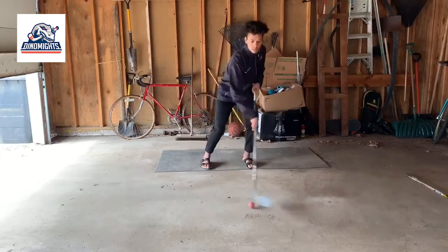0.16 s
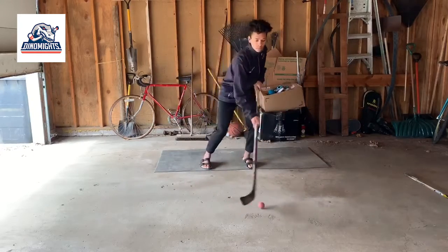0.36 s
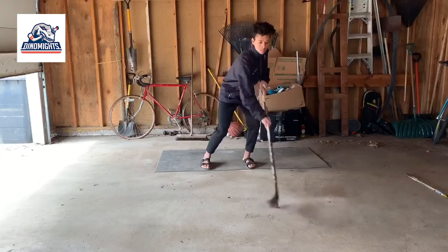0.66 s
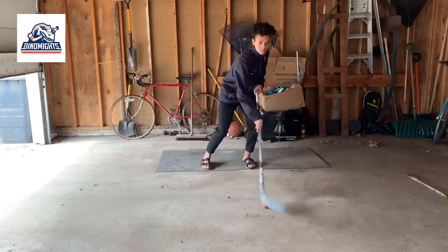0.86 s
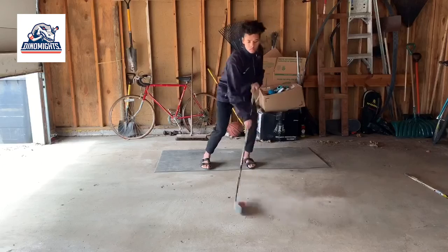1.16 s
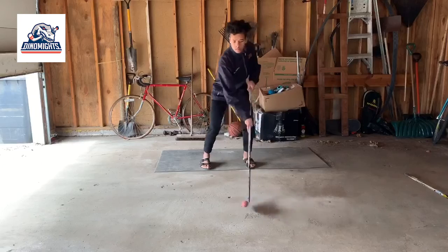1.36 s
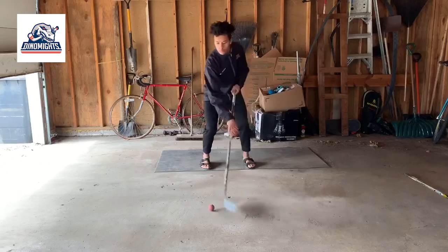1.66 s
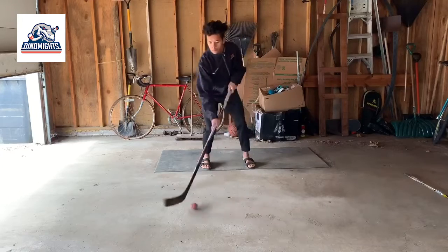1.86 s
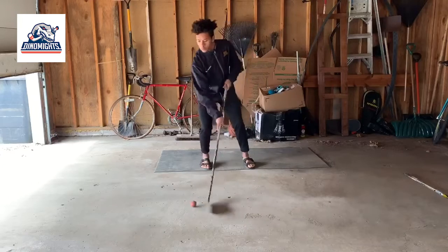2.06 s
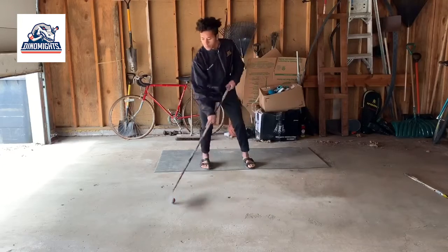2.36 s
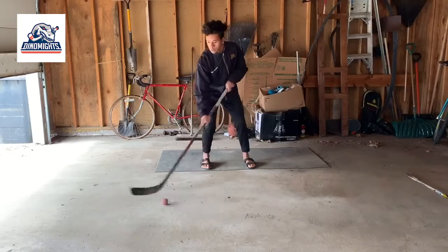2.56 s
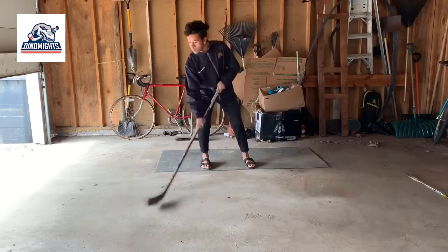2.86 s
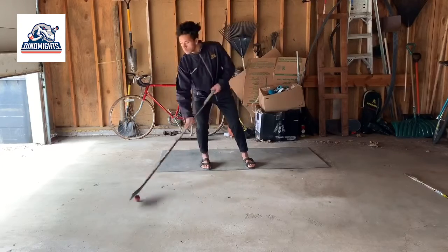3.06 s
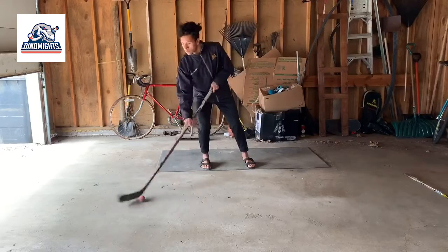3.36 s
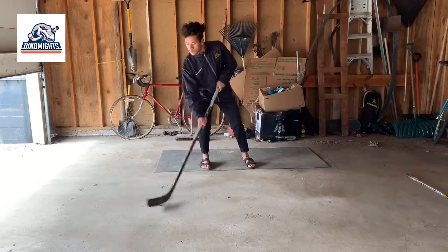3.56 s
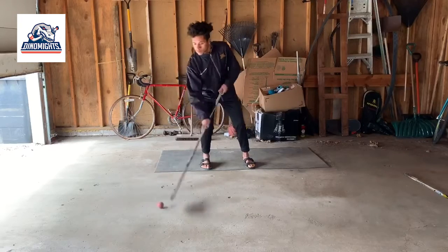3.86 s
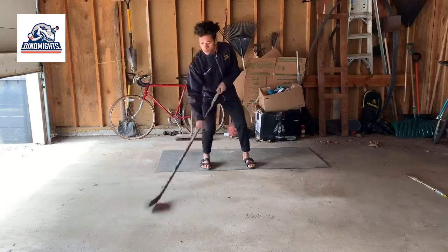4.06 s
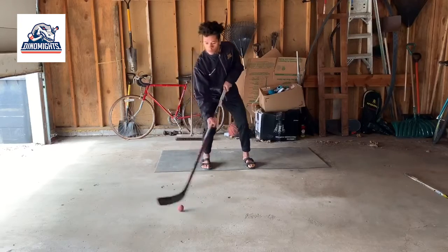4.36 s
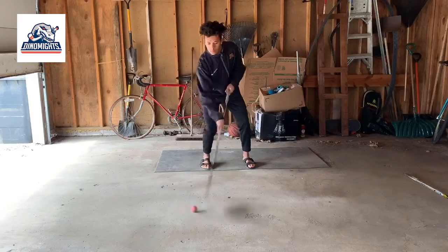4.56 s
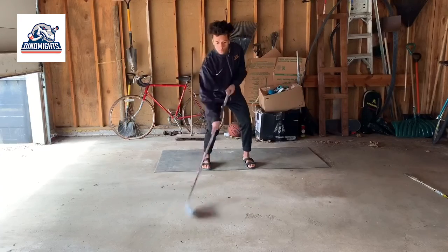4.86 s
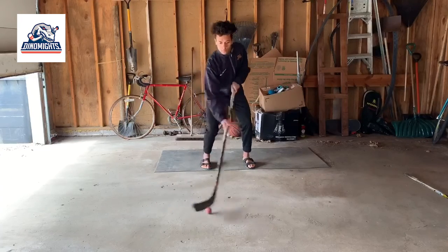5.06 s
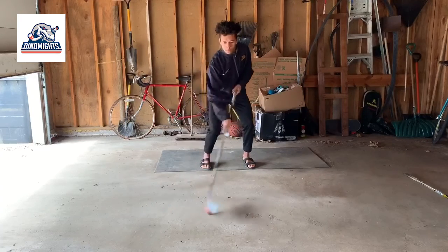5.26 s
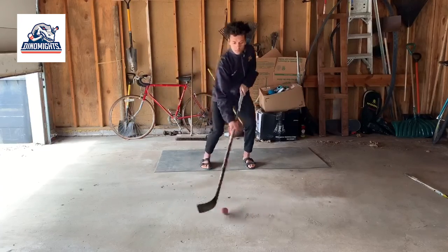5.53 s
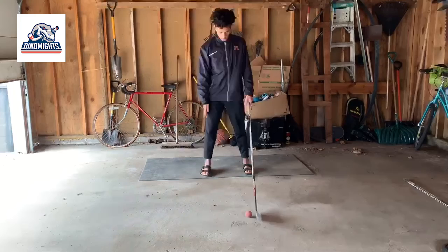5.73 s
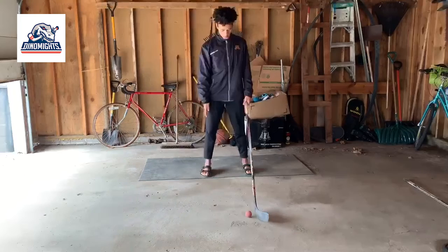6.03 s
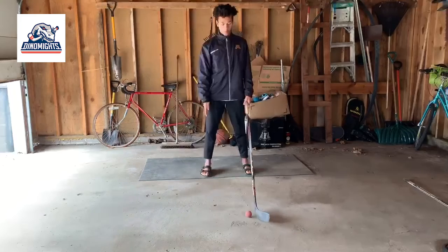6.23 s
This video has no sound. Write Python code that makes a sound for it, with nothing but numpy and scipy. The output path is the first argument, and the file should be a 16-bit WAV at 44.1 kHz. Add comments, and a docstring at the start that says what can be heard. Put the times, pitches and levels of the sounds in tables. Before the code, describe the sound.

Fast, steady clacks of a stick blade on concrete alternate with hollow ball taps in a reverberant garage, then sudden near quiet.

```python
"""A hockey stick sweeps a small hard ball from side to side on a concrete garage floor, near a microphone pair.
Each stroke is a sliding blade that slaps the concrete (struck modes plus noise) and taps the ball (knock and tick).
The bare garage answers with single echoes and a dense tail, over air hiss and distant traffic.
Near the end the play is cut off, and a quieter background follows, with a soft noise swish, a low hum
and one small knock."""
import sys
import numpy as np
from scipy import signal
from scipy.fft import rfft, irfft
from scipy.io import wavfile
from scipy.ndimage import uniform_filter1d, minimum_filter1d

SR = 44100
rng = np.random.default_rng(int(sys.argv[2]) if len(sys.argv) > 2 else 0)


def master_out(mix):
    """Clip the mix to full scale and print it as 16-bit PCM to the path in sys.argv[1]."""
    frames = np.transpose(np.atleast_2d(mix))
    ceiling = np.clip(frames, -1, 1)
    pcm = np.round(ceiling * 32767).astype(np.int16)
    wavfile.write(sys.argv[1], SR, pcm)


N = 281969
LEAD = SR // 5  # samples kept ahead of the start, for a stroke already under way
VARIANTS = 5  # of the garage tail and echoes, used in turn so that strokes do not repeat


def amp(db):
    """Decibels to amplitude factor."""
    return 10 ** (np.asarray(db) / 20)


def peaked(x):
    """Scale to a peak of 1."""
    return x / np.abs(x).max()


def evened(x):
    """Scale to an RMS of 1."""
    return x / np.sqrt(np.mean(x ** 2) + 1e-20)


def read(points, hz):
    """Read a table of (pitch, value) along a logarithmic pitch axis."""
    f, value = np.transpose(points)
    return np.interp(np.log(hz + 1), np.log(f + 1), value)


def curve(rows):
    """Straight lines through (time, value), at every sample."""
    return np.interp(np.arange(N) / SR, *np.transpose(rows))


def add(mix, s, sound):
    """Add a sound to the mix at s seconds, cut off at the end of the mix."""
    part = mix[..., LEAD + round(s * SR):][..., :sound.shape[-1]]
    part += sound[..., :part.shape[-1]]


def rings(hz, db, t60, sense=1):
    """Struck modes: a sum of exponentially dying sines."""
    t = np.arange(4096)[:, None] / SR
    level = amp(db - 60 * t / t60)
    return (sense * level * np.sin(2 * np.pi * hz * t)).sum(1)


def coloured(x, points):
    """Minimum-phase filter with the given spectrum, so nothing sounds before its cause."""
    log_gain = np.log(amp(read(points, np.abs(np.fft.fftfreq(1024, 1 / SR)))))
    response = np.fft.ifft(np.exp(np.conj(signal.hilbert(log_gain)))).real[:256]
    return np.convolve(x, response)[:len(x)]


# Likeness of left and right in the diffuse sound, wide in the middle pitches and mono at the top:
# pitch_hz, likeness (0 to 1)
LIKENESS = [(100, 0.99), (300, 0.91), (700, 0.43), (1500, 0.2), (5000, 0.06), (9000, 0.14), (12000, 1)]


def paired(a, b, hz):
    """Left and right spectra that share this much."""
    same = np.clip(read(LIKENESS, hz), 0, 1)[:, None]
    return np.array([a, same * a + np.sqrt(1 - same ** 2) * b])


def hiss(points, size=1024):
    """Steady two-channel noise: random spectra, shaped, overlapped and set to an RMS of 1."""
    hz = np.fft.rfftfreq(size, 1 / SR)
    a, b, c, d = rng.standard_normal((4 * N // size + 5, len(hz), 4)).T
    z = paired(a + 1j * b, c + 1j * d, hz) * amp(read(points, hz))[:, None]
    noise = signal.istft(z, nperseg=size, noverlap=size * 3 // 4)[1]
    return evened(noise[:, :N])


# Where on the floor the blade lands, seen from the microphones: start_s, left_over_right_db, left_later_ms
FLOOR_SPOTS = [(0, -0.5, 0.038), (1.3, -3, 0.014), (1.6, -3, 0.15), (2.7, 1.9, 0.12), (4.15, 0.5, 0.13),
               (4.5, 0.5, 0.039), (5.7, -0.5, 0.027)]


def placed(s, sound):
    """Level and arrival at the two microphones follow the spot on the floor; a third copy goes to the walls."""
    at, pan_db, later_ms = np.transpose(FLOOR_SPOTS)
    later = round(np.interp(s, at, later_ms) * SR / 1000)
    side = np.array([[.5], [-.5], [0]])
    return amp(side * np.interp(s, at, pan_db)) * np.array([np.roll(sound, later), sound, sound])


# Modes of blade and shaft: pitch_hz, level_db, t60_s
BLADE_MODES = [(324, -4.5, 0.015), (619, -15, 0.013), (880, -30, 0.012), (1076, -54, 0.016),
               (1300, 1, 0.024), (1636, -5, 0.035), (1800, -4.5, .02), (2110, 0.5, 0.015), (2430, 3, 0.016),
               (3130, 8, 0.004), (3260, 0, 0.0097), (3488, 4.5, 0.0032), (4238, -0.5, 0.014),
               (4858, -2, 0.0088), (5670, -2.5, 0.011), (5610, 4.5, 0.0026)]
# Crack of the blade edge: pitch_hz, level_db (per Hz)
EDGE_CRACK = [(1500, -26.5), (3000, 3), (5000, 20.5), (6500, -16.5), (9000, 18.5), (13000, -12.5),
              (16000, -20)]
# Blade sliding on concrete: pitch_hz, level_db (per Hz)
SLIDE_COLOUR = [(250, -10.5), (800, 7.5), (2000, 6.5), (5000, -1), (6800, -16.5), (11000, -11),
                (16000, -14)]
LEAD_IN = 440  # samples of short soft noise before the slap
LEAD_IN_SHARE = .7  # of the sliding noise, just before the slap
DRAG_S, SLIDE_S = 0.0022, 0.07  # decay of the gritty drag; fall of the slide after the slap
UPPER_HZ, UPPER_DB, UPPER_OCTAVES = 3730, 3.5, 1.6  # the stiff upper modes that every blow wakes
CRACK_DB = -16  # crack of a middling blow
CHATTER_DB, CHATTER_S, CHATTER_PER_S = -17, 0.01, 400  # the blade skips on after landing
MIDDLING_DB, CLEANER, CRISPER = -8.5, 0.59, 0.54  # per dB above a middling blow: dB fewer skips, dB more crack


def slap(s, db, hz, slide_db):
    """A blow, a gritty drag and a few skips ring the modes near the strongest pitch; sliding noise surrounds it."""
    f, mode_db, t60 = np.transpose(BLADE_MODES)
    chance, t = rng.standard_normal((4, 8192)), np.arange(8192) / SR
    bend, spread = rng.standard_normal((2, len(f)))

    grit = chance[0] * np.exp(-t / DRAG_S) * np.minimum(t / 0.00037, 1)
    z = rfft(.2 * grit + (np.arange(8192) == 15))
    # flatten the spectrum: the push holds all pitches about alike
    push = irfft(z / np.abs(z) ** .85) * (t < 6 * DRAG_S + .002)
    skips = chance[3] * (rng.random(8192) < CHATTER_PER_S / SR) * np.exp(-(t / CHATTER_S) ** 2)
    harder_db = db - MIDDLING_DB
    drive = push / np.linalg.norm(push) + amp(CHATTER_DB - CLEANER * harder_db) * skips

    near = np.exp(-(np.log2(f / hz) / .5) ** 2)
    near += amp(UPPER_DB) * np.exp(-(np.log2(f / UPPER_HZ) / UPPER_OCTAVES) ** 2)
    weight_db = 20 * np.log10(near + .3) + spread
    varied_hz = f * (1 + .012 * bend)  # each slap's modes vary a little in pitch, at random
    modes = rings(varied_hz, mode_db + weight_db, t60, (-1) ** np.arange(len(f)))
    body = signal.fftconvolve(drive, modes)[:8192]
    body /= np.linalg.norm(body) / np.sqrt(.005 * SR)  # energy as if spread over 5 ms

    crack = amp(CRACK_DB + CRISPER * harder_db) * peaked(coloured(drive, EDGE_CRACK))
    blow = amp(db) * np.roll(body + crack, LEAD_IN)

    since = t - LEAD_IN / SR  # seconds since the slap
    swell = np.where(since < 0, LEAD_IN_SHARE * np.exp(since / 0.01), np.exp(-(since / SLIDE_S) ** 2))
    lumps = amp(7.8 * evened(uniform_filter1d(chance[2], 90)))  # rough patches of concrete
    sliding = amp(slide_db) * evened(coloured(chance[1] * lumps, SLIDE_COLOUR)) * swell
    return placed(s, blow + sliding)


# Blade landing on concrete, levels at the floor: start_s, blow_db, strongest_pitch_hz, slide_db
BLADE_SLAPS = [(-0.1, -39.5, 490, -33.0), (0.097, -13, 2400, -22), (0.281, -9.5, 2840, -25.5),
               (0.486, -10, 1211, -25.5), (0.654, -16, 1280, -26), (0.853, -12.5, 1390, -27),
               (1.027, -17, 1320, -29), (1.214, -11, 1590, -26.5), (1.39, -9, 1410, -31.5),
               (1.595, -8.5, 1240, -24), (1.76, -10, 1290, -22), (1.96, -7.5, 1290, -23),
               (2.129, -8.5, 2230, -22), (2.332, -8, 2000, -29.5), (2.516, -13.5, 1200, -24),
               (2.73, -7, 2640, -24.5), (2.89, -6.5, 2476, -22.5), (3.089, -6, 2420, -25),
               (3.256, -11.5, 2260, -26.5), (3.437, -7, 1280, -26), (3.598, -9, 2110, -25.5),
               (3.792, -7, 2378, -26.5), (3.966, -9.5, 2560, -27), (4.157, -7, 2430, -26),
               (4.324, -14, 2410, -27), (4.52, -8.5, 1940, -27), (4.698, -20, 1630, -31),
               (4.879, -9.5, 1330, -25), (5.063, -18, 1620, -30.5), (5.246, -16.5, 2315, -26.5),
               (5.448, -20.5, 1973, -30.5), (5.635, -13, 1315, -26.5)]


def play_slaps(strokes):
    """Give each slap to the next garage variant in turn, with its soft noise lead-in before the listed start."""
    for k, (s, *row) in enumerate(BLADE_SLAPS):
        add(strokes[k % VARIANTS], s - LEAD_IN / SR, slap(s, *row))


# Single echoes off the bare garage: delay_s, left_db, right_db, right_later_s
WALL_ECHOES = [(.002, -1.5, -0.5, .0002), (.0045, 2, -15, -0.0053), (0.01, -7, -2.5, 0.008),
               (0.0108, -2, -25.5, 0.014), (0.019, -18.5, -23, -0.017)]
# How long the garage rings: pitch_hz, t60_s
GARAGE_DECAY = [(200, 0.44), (600, 0.4), (1400, 0.35), (3700, 0.38), (9700, 0.19), (16000, 0.062)]
# Tail energy over the direct sound: pitch_hz, level_db
TAIL_LEVEL = [(200, 6.5), (700, 8), (2500, 7), (6000, 10), (10000, 6), (15000, -3)]
ECHO_HZ = 6500  # the single echoes are dull above this


def garage(x):
    """A few single echoes, then sparse taps of random sign that die band by band."""
    size = SR * 3 // 5
    taps = np.zeros((2, size))
    at = np.arange(0, size - 20, 20) + rng.integers(0, 20, (2, (size - 1) // 20))
    np.put_along_axis(taps, at, rng.choice([-1., 1.], at.shape), 1)
    taps *= np.clip((np.arange(size) / SR - .004) / 0.0041, 0, 1)  # the tail builds up

    hz, t, z = signal.stft(taps, SR, nperseg=256)
    z = paired(*z, hz) * amp(-60 * t / read(GARAGE_DECAY, hz)[:, None])
    z *= (amp(read(TAIL_LEVEL, hz)) / np.linalg.norm(z[0], axis=1))[:, None]
    tail = signal.istft(z, SR, nperseg=256)[1] / np.sqrt(128 ** 3 / 96)  # energy 1 at 0 dB

    early = np.zeros((2, SR // 20))
    for s, left_db, right_db, later in WALL_ECHOES:
        arrival_s = np.array([s, s + later]) + .0005 * rng.standard_normal()
        early[[0, 1], np.round(arrival_s * SR).astype(int)] += amp([left_db, right_db])
    early = signal.lfilter(*signal.butter(2, ECHO_HZ, fs=SR), early)
    early[:, 0] = 1  # the direct sound

    wet = signal.fftconvolve(x[-1:], tail, axes=1)[:, :x.shape[1]]
    return wet + signal.fftconvolve(x[:2], early, axes=1)[:, :x.shape[1]]


# Air hiss: pitch_hz, level_db (per Hz)
AIR_COLOUR = [(200, -8.5), (400, -5.5), (1700, -7.5), (8000, -13.5), (12000, -18.5), (16000, -16.5)]
# Its level, stepping at the cut, fading, then changing again: start_s, level_db
AIR_LEVEL = [(0, -77), (5.78, -60), (5.8, -68.5), (6.25, -82), (6.258, -62.5), (6.39, -63.5)]


def air_hiss():
    """Shaped steady noise whose level follows a curve."""
    return amp(curve(AIR_LEVEL)) * hiss(AIR_COLOUR)


# Distant traffic: pitch_hz, level_db (per Hz)
TRAFFIC_COLOUR = [(20, -43.5), (40, -15.5), (58, -9), (73, -1.5), (95, -6), (150, -3), (250, -7),
                  (330, -5.5), (500, -54)]
# Its level, stepping at the cut, fading, then changing again: start_s, level_db
TRAFFIC_LEVEL = [(0, -49), (5.78, -48), (5.8, -65), (6.25, -81), (6.26, -81), (6.39, -73)]


def distant_traffic():
    """Low shaped noise, in long frames so that the bass is finely resolved."""
    return amp(curve(TRAFFIC_LEVEL)) * hiss(TRAFFIC_COLOUR, size=4096)


# The hard ball's answer to a blow: pitch_hz, gain_db
BALL_TICK = [(4000, -14.5), (7500, 19.5), (11000, 19), (14500, 25), (16500, 14)]


def tap(db, hz, tick_db):
    """The ball gives a bright tick, a filtered impulse; the blade under it a hollow knock of its modes."""
    f, _, t60 = np.transpose(BLADE_MODES)
    knock = rings(f, -7.0 * np.log2(f / hz) ** 2, 1.38 * t60)  # rings longer than in a slap
    impulse = np.arange(4096) == 0
    return amp(db) * peaked(knock) + coloured(amp(tick_db) * impulse, BALL_TICK)


# Blade meeting ball, levels at the ball: start_s, knock_peak_db, knock_pitch_hz, tick_blow_db
BALL_TAPS = [(0.144, -7, 790, -24), (0.306, -8.5, 530, -17), (0.523, -7, 950, -18.5),
             (0.682, -9.5, 926, -20), (0.907, -11.5, 853, -29), (1.054, -6, 1030, -20),
             (1.247, -5.5, 1086, -46), (1.421, -14.5, 568, -71), (1.658, -18.5, 875, -30),
             (1.824, -11, 861, -24.5), (1.981, -5, 857, -20.5), (2.196, -5, 864, -16),
             (2.345, -3.5, 910, -20), (2.544, -8, 614, -18.5), (2.734, -26, 1070, -14.5),
             (2.949, -33.5, 871, -26), (3.127, -9.5, 982, -19), (3.303, -12, 892, -30),
             (3.462, -8, 573, -18), (3.63, -11.5, 590, -15.5), (3.837, -49.5, 977, -23.5),
             (3.993, -9.5, 611, -18), (4.174, -10.5, 934, -17.5), (4.35, -12, 695, -20),
             (4.544, -7.5, 1090, -61), (4.705, -9.5, 740, -22.5), (4.899, -10.5, 937, -20.5),
             (5.072, -6.5, 1060, -24), (5.284, -5.5, 970, -22.5), (5.46, -11.5, 656, -24.5),
             (5.67, -9.5, 864, -22)]


def play_taps(strokes):
    """Place every tap midway between the microphones, giving each to the next garage variant in turn."""
    for k, (s, *row) in enumerate(BALL_TAPS):
        add(strokes[(k + 3) % VARIANTS], s, tap(*row))


SHED_HZ = 280  # the slim blade radiates little below this
CUT_S = 5.79  # the play is silent from here on


def ball_play():
    """All slaps and taps with the garage's answers, cut off by a 3 ms fade, then thinned in the bass."""
    strokes = np.zeros((VARIANTS, 3, N + LEAD))
    play_slaps(strokes)
    play_taps(strokes)
    play = sum(garage(group) for group in strokes)[:, LEAD:]
    play *= np.clip((CUT_S - np.arange(N) / SR) / .003, 0, 1)
    return signal.sosfilt(signal.butter(3, SHED_HZ, "high", fs=SR, output="sos"), play)


# Colour of the swish: pitch_hz, level_db (per Hz)
SWISH_COLOUR = [(120, -30.5), (200, -19), (347, -10), (1560, -13), (1770, -12), (5630, -17.5), (6760, -19),
                (13100, -27), (16000, -33)]
SWISH_MIDDLE_S, SWISH_HALF_S, SWISH_DB = 5.945, 0.038, -57.5  # level before the garage


def swish():
    """A short bell-shaped brush of noise, heard in the garage."""
    swell = np.exp(-((np.arange(N) / SR - SWISH_MIDDLE_S) / SWISH_HALF_S) ** 2)
    return garage(amp(SWISH_DB) * swell * hiss(SWISH_COLOUR))


HUM_HZ, HUM_DB, HUM_START_S = 63, -63, 6.257


def late_hum():
    """Noise through a narrow low resonance wavers like a hum; it sets in at once."""
    hum = signal.lfilter(*signal.iirpeak(HUM_HZ, 5.0, SR), rng.standard_normal(N))
    return amp(HUM_DB) * evened(hum) * (np.arange(N) / SR > HUM_START_S)


# The small knock: start_s, peak_db
SMALL_KNOCK = [(6.352, -41.5)]
# Its modes: pitch_hz, level_db, t60_s
SMALL_KNOCK_MODES = [(545, -7, 0.025), (1000, -12, 0.01), (1570, -16, 0.034)]


def small_knock():
    """A few short struck modes, dry and midway between the microphones."""
    knock = np.zeros(N + LEAD)
    for s, db in SMALL_KNOCK:
        add(knock, s, amp(db) * peaked(rings(*np.transpose(SMALL_KNOCK_MODES))))
    return knock[LEAD:]


def scene():
    """The ball play, the swish and the small knock over the background."""
    background = air_hiss() + distant_traffic() + late_hum()
    return ball_play() + swish() + small_knock() + background


# Lean of the microphone pair: pitch_hz, left_over_right_db
PAIR_LEAN = [(60, 1), (200, 3), (700, 0), (2000, 0), (4500, 2.5), (9000, 0.5)]
# Phase by which left leads: pitch_hz, lead_rad
PAIR_LEAD = [(300, -1), (1290, 0.43), (2000, 1.22), (3600, 2.5), (5700, 7), (7000, 6.5)]
ALIKE_HZ = 500  # below this the lead shrinks towards zero, so both microphones fall into step
CEILING = .9  # of the peak limiter, ahead of the last two filters
PORT_HZ, EDGE_HZ = 44.5, 16100  # bass roll-off and upper band limit of the recorder


def record(dry):
    """Lean and spacing of the microphone pair, gain that dips on loud blows, a peak limiter, then the band limits."""
    hz = np.fft.rfftfreq(2 * N, 1 / SR)
    side = np.array([[.5], [-.5]])
    lead = read(PAIR_LEAD, hz) * np.minimum(hz / ALIKE_HZ, 1)
    pair = amp(side * read(PAIR_LEAN, hz)) * np.exp(1j * (side - .5) * lead)
    heard = irfft(rfft(dry, 2 * N) * pair)[:, :N]

    # gain control: the sensed level jumps up with the sound and falls back steadily
    power_db = 10 * np.log10(abs(uniform_filter1d((heard ** 2).max(0), 88)) + 1e-12)
    fall = np.arange(N) * 58.0 / SR  # fall of the sensed level, 58 dB a second
    sensed_db = np.maximum.accumulate(power_db + fall) - fall
    over_db = np.maximum(sensed_db + 26.0, 0)  # above a threshold of -26 dB
    held = heard / amp(0.36 * uniform_filter1d(over_db, size=110))

    # limiter: the lowest gain needed nearby, smoothed
    room = minimum_filter1d(CEILING / np.maximum(np.abs(held).max(0), CEILING), size=133)
    held = held * uniform_filter1d(room, size=110)

    held = signal.lfilter(*signal.butter(2, PORT_HZ, "high", fs=SR), held)
    band = signal.firwin(511, EDGE_HZ, window=("kaiser", 9), fs=SR)
    return signal.oaconvolve(held, band[None], "same")


dry = scene()
out = record(dry)
master_out(out)
```